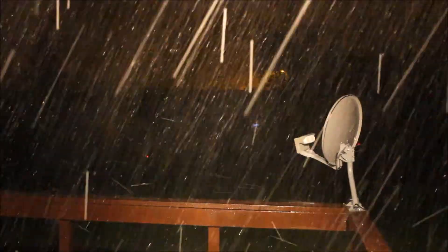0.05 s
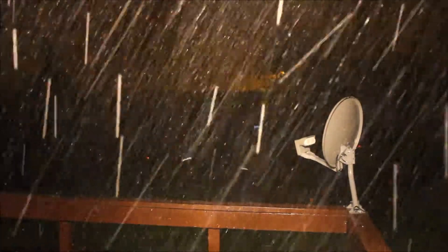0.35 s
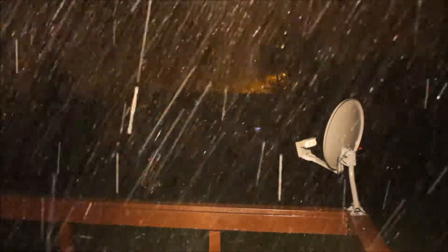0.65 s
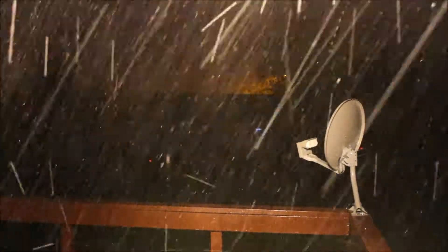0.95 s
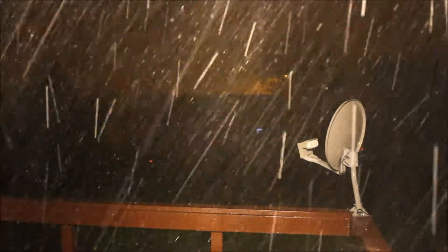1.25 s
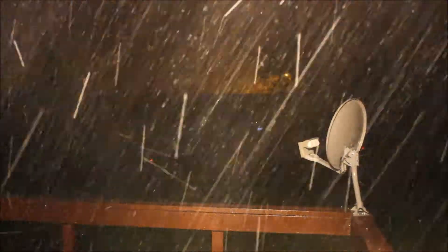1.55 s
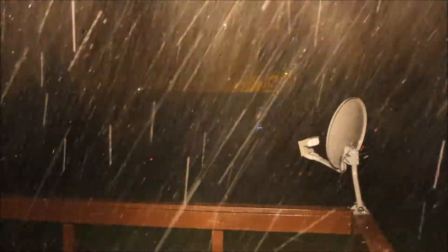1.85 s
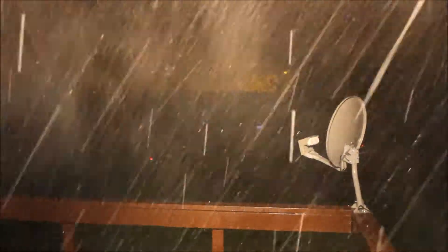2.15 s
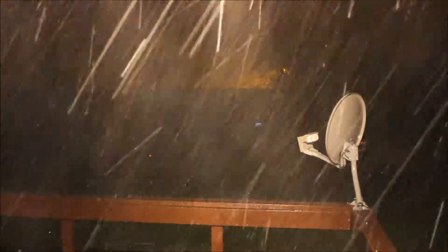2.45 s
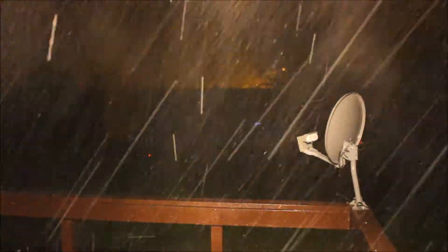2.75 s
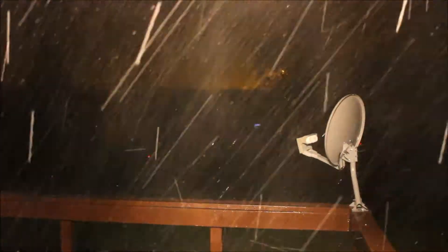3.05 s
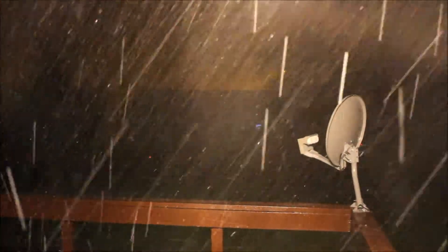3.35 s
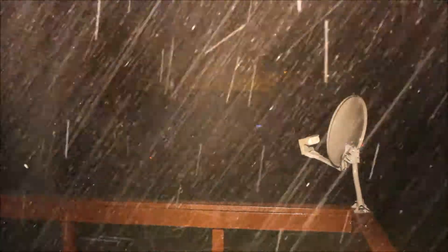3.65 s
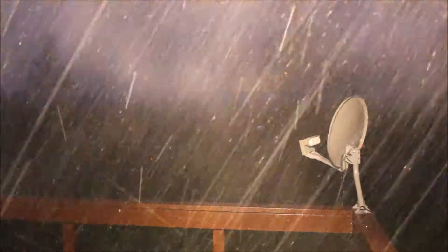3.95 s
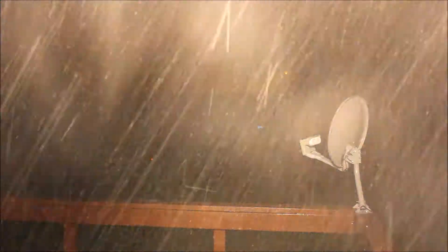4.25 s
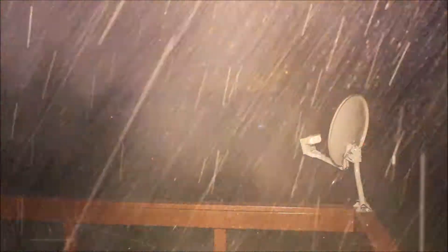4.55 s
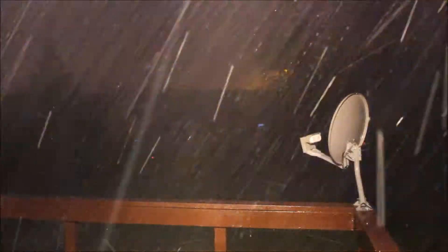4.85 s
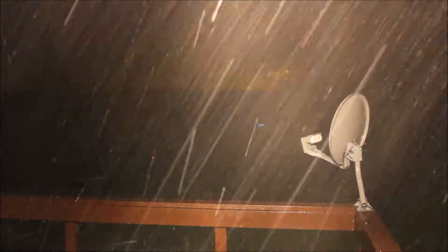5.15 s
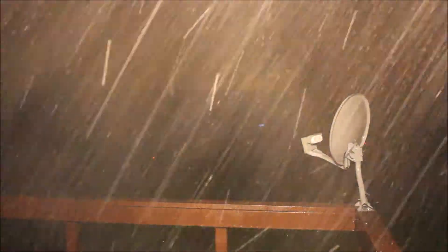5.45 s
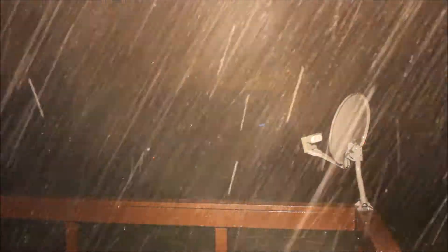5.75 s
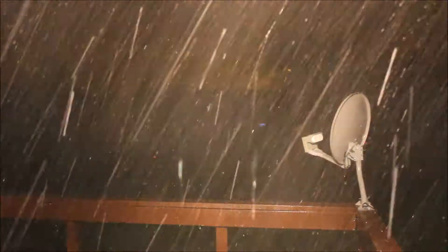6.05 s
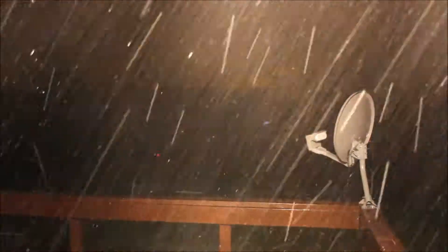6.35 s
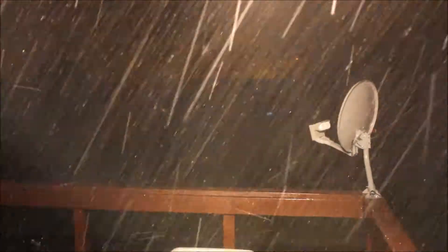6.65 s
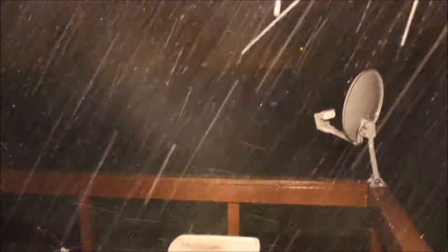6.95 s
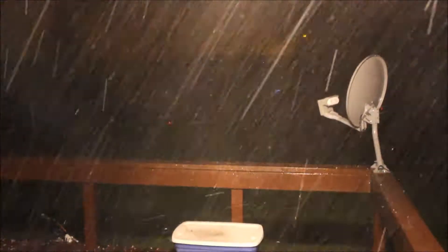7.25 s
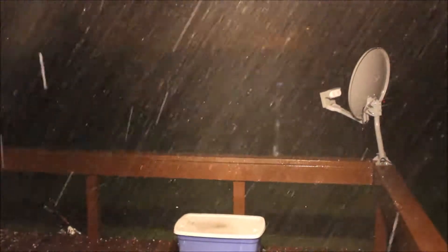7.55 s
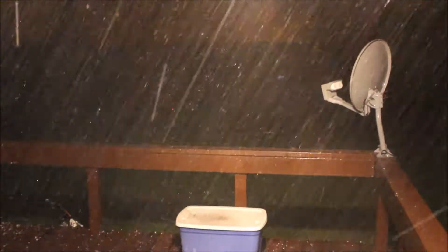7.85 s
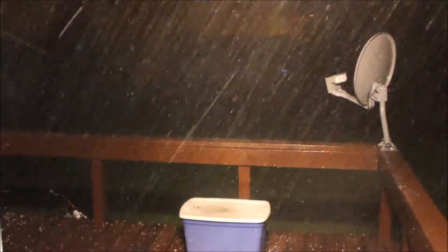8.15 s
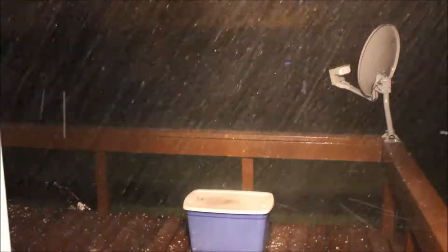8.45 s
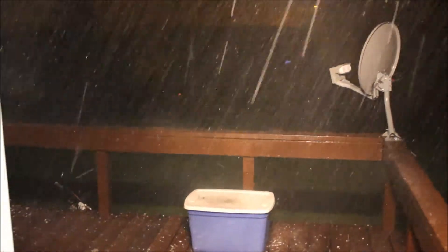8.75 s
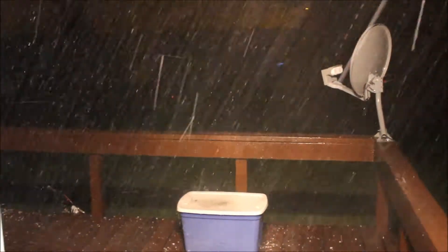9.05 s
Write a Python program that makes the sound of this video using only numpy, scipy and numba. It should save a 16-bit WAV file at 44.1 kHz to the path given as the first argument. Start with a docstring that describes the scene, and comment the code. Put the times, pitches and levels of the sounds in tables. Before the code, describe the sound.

Heavy rain mixed with small hail pours onto a wooden deck, with sharp cracks and occasional pings on metal.

```python
"""The edge of a wooden deck at night, in a downpour mixed with small hail, heard in mono.
Countless far drops merge into a wash, drum on the roof and set a metal panel singing, over a low wind.
Near drops tick and spray on the boards, and gusts throw clumps of water and ice. Up front, single
hailstones crack on wet wood or ping on metal, and a limiter ducks after the hardest hits."""
import sys
import numpy as np
from scipy import signal
from scipy.fft import rfft, irfft, next_fast_len
from scipy.io import wavfile
from scipy.ndimage import uniform_filter1d, minimum_filter1d
from numba import njit

SR = 44100
rng = np.random.default_rng(int(sys.argv[2]) if len(sys.argv) > 2 else 0)


def transcribe(signal):
    """Save signal, clipped to [-1, 1], as a 16-bit WAV file at the path in sys.argv[1]."""
    frames = np.atleast_2d(signal).T
    limited = np.clip(frames, -1, 1)
    pcm = np.round(limited * 32767).astype(np.int16)
    wavfile.write(sys.argv[1], SR, pcm)


N = 401751

# Fader moves of the downpour. Each row: time in seconds, rain level in dB, fine spray and drumming
# in dB relative to the rain, roof rumble in dB. The mix adds its own trims.
DOWNPOUR = [(0.0, -23.5, -2.5, -13, -43.9), (0.88, -25, -2, -12, -43.5), (0.98, -26.5, -3, -11.5, -45),
            (1.22, -22.5, -3, -9.5, -39.5), (1.62, -23, -1.7, -13.5, -43), (1.72, -26, -3.3, -11.5, -44),
            (1.9, -24.4, -0.5, -11, -43.5), (2.42, -24.8, -2.0, -12.5, -41.9),
            (2.56, -23.5, -1.3, -9.5, -43.3), (2.98, -24.0, -2.2, -11.9, -41.6),
            (3.08, -21, -3.5, -11.5, -44), (3.32, -25.5, -1.5, -12, -44), (3.58, -21.5, -4, -9.5, -36.8),
            (3.78, -23.5, -1.7, -11.5, -40.9), (4.1, -20, -0.5, -12, -38), (4.36, -25, -0.3, -11.8, -45),
            (4.99, -25.5, -1.3, -12, -41), (5.61, -23.5, 0.7, -10.5, -37.5), (5.75, -27.5, 0, -12.6, -43),
            (6.11, -23, 0.0, -11.5, -39.7), (7.29, -23, -0.7, -11, -38.5),
            (7.39, -25.4, -1.5, -12.0, -41.6), (7.89, -25.5, -2, -10.5, -40.5), (8.27, -25, -2, -10.5, -37),
            (9.11, -24.5, -1.7, -10.0, -39.5)]
# EQ curves for wind, roof thumps, far wash and near patter. Each row: frequency in Hz, gain in dB.
WIND_EQ = [(25, -24), (42, -29), (60, -3), (80, 0), (110, 4), (200, -19), (500, -50)]
ROOF_EQ = [(40, -39), (90, -24), (130, -3), (190, -1), (240, 5), (350, 5.5), (450, -7.5), (800, -36)]
WASH_EQ = [(300, 1.5), (440, -6), (600, -3.5), (760, -1), (900, -2), (1150, -2), (2000, -2.5),
           (3100, -0.84), (4200, -2.5), (6200, -4.5), (8600, -4), (11700, -5), (14300, -7), (15500, -10.5)]
PATTER_EQ = [(200, -29), (700, -2.5), (2000, -0.5), (4000, 1.5), (7000, 4), (10000, 6), (13000, 3),
             (15500, -3)]
# Modes of the roof, a sheet-metal panel and the metal that hail strikes.
# Each row: pitch in Hz, relative level in dB, seconds to die away by 60 dB.
ROOF_RINGS = [(102.5, -4.5, 0.4), (179, -0.5, 0.21), (230.5, 0, 0.17), (276, 1, 0.24), (331.4, -1.5, 0.4),
              (498, 2, 0.24)]
PANEL_RINGS = [(984, -3.5, 0.34), (589, -1, 0.2), (737, -1.5, 0.25), (783, -2.5, 0.29), (1018, -7, 0.13),
               (1150, -9.5, 0.23)]
METAL_RINGS = [(3640, 4, 0.083), (4710, -7, 0.18), (7000, -4, 0.096), (8360, 0.5, 0.067),
               (8700, -2.5, 0.084), (9100, -21, .1), (9300, -11, .1), (10000, -2, 0.086),
               (10600, -3.5, 0.054), (10800, -6, .07), (11960, -4.5, .07), (11930, -11, .08),
               (12900, -5, .08), (14000, -8, .1), (14560, -9, .1)]
# Gusts on the microphone. Each row: peak time in seconds, relative level in dB, half length in seconds.
WIND_GUSTS = [(3.55, -46, .12), (8.3, -44, 0.25)]
# Wind-thrown clumps of water and ice. Each row: peak time in seconds, level in dB, centre in Hz,
# width in octaves, fall time in seconds.
CLUMPS = [(0.335, -23, 2500, 1.2, .03), (0.497, -21.5, 3000, 1.2, .028), (0.692, -18, 12000, .6, .015),
          (0.703, -24, 1010, .13, .06), (0.775, -24.5, 1400, 1.2, .05), (1.399, -22.5, 1900, 0.18, .02),
          (1.615, -27.5, 710, .14, .03), (2.06, -24, 1500, 1.1, .04), (2.500, -28, 760, 0.2, 0.023),
          (2.645, -17, 3000, .87, 0.01), (2.82, -22, 1800, 1.0, .02), (3.020, -29, 980, 0.13, .06),
          (3.125, -22.5, 1500, 1.2, .018), (3.456, -18, 3000, 0.94, 0.0069),
          (3.931, -16.5, 1900, 0.93, 0.017), (3.945, -33, 173, .3, .03), (3.965, -18, 2700, 0.48, 0.026),
          (4.075, -21, 2200, 0.82, .055), (4.249, -18, 1400, 0.81, .005), (4.671, -12.5, 6000, 0.65, .007),
          (4.685, -25.5, 374, .35, 0.023), (4.69, -25, 930, 0.17, .016), (5.155, -26, 600, .5, .025),
          (5.363, -23, 1100, 0.85, .012), (5.535, -22, 660, .45, 0.022), (5.92, -35, 175, .3, 0.032),
          (6.42, -19, 5000, 1.5, 0.019), (6.688, -19, 3300, 0.89, 0.014), (6.883, -18, 2000, 1.2, .014),
          (7.251, -17, 8000, .5, .009), (7.254, -16, 4940, 0.11, .008), (8.122, -19, 1300, 1, .01),
          (8.139, -16, 2400, 1, .024), (8.360, -12, 3900, .6, .005), (8.557, -18.5, 1500, 1.3, .007),
          (8.76, -29, 620, 0.33, .03), (8.92, -24, 2500, .9, 0.016)]
# Hail on metal. Each row: start in seconds, relative level in dB, most favoured frequency in Hz,
# reach across the modes in octaves.
METAL_HITS = [(0.619, -8, 8500, .28), (0.843, -12, 10500, .4), (0.852, -10.5, 13500, 0.3),
              (1.667, -8, 8400, 0.87), (4.262, -14, 10000, .3), (4.272, -9, 12300, .25),
              (5.258, -10.5, 9000, 0.33), (5.525, -14, 9000, .7), (5.546, -10, 13000, 0.44),
              (7.253, -10, 4800, 0.19)]
# The loudest hailstones on the wet deck. Each row: start in seconds, relative crack level in dB,
# pitch in Hz, relative splat level in dB.
DECK_HITS = [(0.103, -2, 11000, -20), (0.214, -3, 10600, -20), (0.345, -5, 7200, -18.5),
             (0.503, 4.5, 9300, -22), (0.524, 1, 4900, -19), (1.005, -5, 8300, -20), (1.331, 1, 5800, -22),
             (1.508, -6, 8600, -22), (1.580, -5, 7500, -16), (1.835, -5, 5900, -23), (1.919, -4, 3800, -22),
             (2.116, -5, 6000, -19), (2.16, -2, 7100, -28), (2.267, -2, 6100, -21), (2.684, 1, 6450, -25),
             (3.004, -9, 7000, -20), (3.115, -1, 5370, -17), (3.274, -3, 3500, -22),
             (3.294, -11, 7000, -19), (3.618, -4, 6700, -21), (3.700, -3, 5600, -21),
             (3.756, -8, 9000, -21), (3.998, 6, 8100, -25), (4.246, 4.5, 10000, -27),
             (4.285, 6, 10300, -26), (4.399, -9, 6400, -19), (4.673, 0, 6300, -22), (4.827, -1, 5900, -22),
             (5.623, 5.5, 8600, -21), (5.718, -6, 9100, -25), (6.370, -5, 8400, -20),
             (6.689, -5, 7100, -18), (6.88, -6, 6000, -16), (6.937, -2, 8500, -26), (7.239, -6, 10200, -16),
             (7.406, -7, 7000, -18), (7.582, -3, 6900, -20), (7.815, 0, 8900, -23), (7.94, -7, 7000, -20),
             (8.003, 9, 9000, -17), (8.215, -8, 3000, -20), (8.271, -10, 4400, -19), (8.360, 1, 3940, -21),
             (8.449, -11, 2700, -22), (8.557, -9, 2900, -23), (8.66, -4, 4700, -26), (8.73, -11, 7000, -18),
             (8.77, -6, 8700, -23), (8.957, 0, 7400, -27), (9.076, -2, 9200, -20)]


def undb(db):
    """Decibels to gain."""
    return 10 ** (np.asarray(db) / 20)


def unit(x):
    """Scale to an rms of one."""
    return x / np.sqrt(np.mean(x ** 2))


def curves(table):
    """The columns of a time table as fader curves, one value a sample."""
    s, *columns = np.transpose(table)
    return [np.interp(np.arange(N) / SR, s, column) for column in columns]


def gain_at(hz, eq):
    """Gain of an EQ curve at the given frequencies."""
    points_hz, db = np.transpose(eq)
    return undb(np.interp(np.log(hz + 1e-9), np.log(points_hz), db))


def colour(x, eq):
    """Run a sound through an EQ curve."""
    return irfft(rfft(x) * gain_at(np.fft.rfftfreq(len(x), 1 / SR), eq), len(x))


def bell(hz, centre_hz, octaves):
    """A bell-shaped weight on the octave scale."""
    return np.exp(-.5 * (np.log2((hz + 1e-9) / centre_hz) / octaves) ** 2)


def band(x, centre_hz, octaves):
    """Keep a bell-shaped band of a sound."""
    return irfft(rfft(x) * bell(np.fft.rfftfreq(len(x), 1 / SR), centre_hz, octaves), len(x))


def low_cut(x, hz):
    """Roll off the lows at 12 dB an octave."""
    return signal.sosfilt(signal.butter(2, hz, "high", fs=SR, output="sos"), x)


def walk(rate):
    """A smooth random wander with about this many turns a second."""
    step = max(int(SR / rate), 1)
    stairs = np.repeat(rng.standard_normal(N // step + 1), step)
    return unit(uniform_filter1d(stairs, step)[:N])


def add(out, s, sound):
    """Mix a sound in, starting at s seconds."""
    i = max(int(s * SR), 0)
    out[i:i + len(sound)] += sound[:max(N - i, 0)]


def ring(hz, t60, t):
    """A struck mode."""
    return np.sin(2 * np.pi * hz * t) * np.exp(-np.log(1000) * t / t60)


def resonate(hits, modes):
    """Let hits ring a table of modes."""
    t = np.arange(SR // 2) / SR
    response = sum(undb(db) * ring(hz, t60, t) for hz, db, t60 in modes)
    return unit(signal.fftconvolve(hits, response)[:N])


@njit
def grains(start, hz, cycles, size):
    """Tiny damped rings, each fading from its start sample by 1 / e in its number of cycles."""
    out = np.zeros(N)
    for k in range(len(start)):
        life = cycles[k] * SR / hz[k]
        phasor, turn = size[k] + 0j, np.exp(2j * np.pi * hz[k] / SR - 1 / life)
        for i in range(int(start[k]), min(int(start[k] + 6 * life) + 2, N)):
            out[i] += phasor.imag
            phasor *= turn
    return out


@njit
def peak_hold(x, release):
    """An envelope that jumps to each peak and sinks back."""
    out, level = np.empty(len(x)), 0.
    for i in range(len(x)):
        level = max(abs(x[i]), level * release)
        out[i] = level
    return out


def smooth(x, keep):
    """A one-pole lag that keeps this share of its value each sample."""
    return signal.lfilter([1 - keep], [1, -keep], x)


def grit(length, spread_db, piece_samples):
    """Noise in short pieces of uneven strength, like a clump of droplets."""
    strength = undb(spread_db * np.clip(rng.standard_normal(length // piece_samples + 1), -2, 2))
    return rng.standard_normal(length) * np.repeat(strength, piece_samples)[:length]


def spray(hits, fall_s):
    """Each hit bursts into droplets: a hiss that takes its energy and dies away."""
    energy = smooth(hits ** 2 + 1e-18, np.exp(-2 / (fall_s * SR)))
    hiss = np.diff(rng.standard_normal(N + 1))
    return np.sqrt(energy) * unit(signal.lfilter([1], [1, -.5], hiss))


def drops(count, pitch_hz, octaves, cycles, spread_db):
    """Drops land at random, many small and a few large, each a tick of its own pitch."""
    when, pitch, damping, weight = rng.random((count, 4)).T
    hz = np.minimum(pitch_hz * 2 ** (octaves * (2 * pitch - 1)), .4 * SR)
    size = undb(spread_db * -np.log(weight + .017))  # capped: drops break up above a certain size
    ticks = grains(when * N, hz, cycles * (.5 + damping), size)
    return unit(ticks - ticks.mean())


def wind(breeze_db=-56, wander_db=2.5):
    """Eddies press on the microphone: a wandering breeze with gusts on top."""
    t = np.arange(N) / SR
    gusts = sum(undb(db) * np.exp(-((t - s) / half_s) ** 2) for s, db, half_s in WIND_GUSTS)
    breeze = undb(breeze_db + wander_db * walk(3))
    return np.hypot(breeze, gusts) * unit(colour(rng.standard_normal(N), WIND_EQ))


def roof(ring_db=-5):
    """Heavy drops thump on the roof, ring its low modes and blur into a rumble."""
    thumps = drops(count=5000, pitch_hz=2500, octaves=0.55, cycles=0.29, spread_db=3.0)
    return unit(unit(colour(thumps, ROOF_EQ)) + undb(ring_db) * resonate(thumps, ROOF_RINGS))


def panel():
    """Drumming drops keep a sheet-metal panel singing."""
    hits = drops(count=400, pitch_hz=2500, octaves=0.85, cycles=0.6, spread_db=-1.5)
    return resonate(hits, PANEL_RINGS)


def wash(spray_db, drum_db, flicker_db=1.06, flutter_db=0.91, spray_ref_db=0.5, drum_ref_db=-10):
    """Far drops merge into a bed of noise; its top rides the spray, its low end the drumming."""
    size = next_fast_len(N)
    hz = np.fft.rfftfreq(size, 1 / SR)
    bass_fade = 1 - bell(np.maximum(hz, 250), 240, 0.49)  # far drops carry no bass
    spectrum = rfft(rng.standard_normal(size)) * gain_at(hz, WASH_EQ) * bass_fade
    spectrum /= np.std(irfft(spectrum * ((hz > 1300) & (hz < 6000))))  # the mids set the level
    out = 0
    for centre in 250 * 2 ** np.arange(0, 6.5, .5):  # each half octave flickers on its own
        share = np.maximum(1 - 2 * abs(np.log2((hz + 1e-9) / centre)), 0)
        top_db = bell(centre, 9900, 0.66) * (spray_db - spray_ref_db)
        low_db = bell(centre, 600, 0.95) * (drum_db - drum_ref_db)
        out = out + irfft(spectrum * share)[:N] * undb(top_db + low_db + flicker_db * walk(28))
    return out * undb(flutter_db * walk(45))


def patter(spray_db, tick_db=-8, burst_db=-11, tap_db=-11, mist_db=-8, burst_mist_db=2):
    """Near drops tick on wet boards with a short hiss; some burst into mist, and heavy ones tap lower."""
    ticks = drops(count=10000, pitch_hz=10600, octaves=0.92, cycles=0.38, spread_db=5.5)
    ticks += undb(mist_db) * spray(ticks, fall_s=0.0047)
    bursts = drops(count=600, pitch_hz=9000, octaves=0.83, cycles=0.47, spread_db=4.0)
    bursts += undb(burst_mist_db) * spray(bursts, fall_s=0.0043)
    taps = drops(count=5000, pitch_hz=2730, octaves=1.25, cycles=1.8, spread_db=3.5)
    sizzle = colour(undb(tick_db) * unit(ticks) + undb(burst_db) * unit(bursts), PATTER_EQ)
    return sizzle * undb(0.37 * spray_db) + undb(tap_db) * taps


def clacks(scatter_db=-6):
    """Small hail pellets hit the boards: woody clacks, each with a short scatter."""
    hits = drops(count=450, pitch_hz=3760, octaves=0.77, cycles=2.5, spread_db=2.0)
    return unit(hits + undb(scatter_db) * spray(hits, fall_s=0.0055))


def splashes(rise_share=.35):
    """A clump of drops lands together: a gritty burst in the pitch range of what it hits."""
    out, t = np.zeros(N), np.arange(-SR // 10, SR // 4) / SR
    for s, db, centre_hz, octaves, fall_s in CLUMPS:
        envelope = np.exp(-abs(t) / np.where(t < 0, rise_share * fall_s, fall_s))
        burst = envelope * band(grit(len(t), spread_db=3.0, piece_samples=40), centre_hz, octaves)
        add(out, s + t[0], undb(db) * unit(burst) * np.sqrt(np.mean(envelope ** 2)))
    return out


def splats(boost_db=3, fall_s=0.0065):
    """Each hailstone throws a brief crown of uneven droplets off the wet boards."""
    out, t = np.zeros(N), np.arange(SR // 20) / SR
    for s, _, _, db in DECK_HITS:
        droplets = grit(len(t), spread_db=1.5, piece_samples=8)
        crown = unit(band(droplets, centre_hz=9500, octaves=1.0))
        add(out, s, undb(db + boost_db) * crown * np.exp(-t / fall_s))
    return out


def pings(click_db=2, click_s=0.00067, rattle_db=-14, rattle_s=.009, uneven_db=2.5):
    """A hailstone clicks on metal and rattles briefly; where it lands decides which modes speak."""
    out, t = np.zeros(N), np.arange(SR // 4) / SR
    contact = undb(click_db) * np.exp(-t / click_s) + undb(rattle_db) * np.exp(-t / rattle_s)
    for s, level_db, centre_hz, reach in METAL_HITS:
        spots_db = uneven_db * rng.standard_normal(len(METAL_RINGS))
        modes = sum(undb(db + spot_db) * bell(hz, centre_hz, reach) * ring(hz, t60, t)
                    for (hz, db, t60), spot_db in zip(METAL_RINGS, spots_db))
        noise = unit(band(rng.standard_normal(len(t)), centre_hz, 2 * reach))
        add(out, s, undb(level_db) * (modes + contact * noise) / 2)
    return out


def cracks(cycles=0.94, boost_db=2.0, edge_db=-4, shatter_db=-9, chip_db=-9, chip_s=.0025):
    """A hailstone snaps on wood in a cycle or two; two chips land just after, and the rest scatters."""
    s, db, hz, _ = np.transpose(DECK_HITS)
    lags, detunes = rng.random((len(s), 2, 2)).T
    life, size = np.full(len(s), cycles), undb(db + boost_db)
    snaps = grains(s * SR, hz.copy(), life, size)
    edge_hz = np.minimum(1.84 * hz, .33 * SR)  # the first hard contact is brighter than the wood
    snaps += grains(s * SR, edge_hz, life / 2, size * undb(edge_db))
    for lag, detune in zip(lags, detunes):
        chip_hz = np.minimum(hz * (1 + detune), .33 * SR)
        snaps += grains((s + chip_s * lag) * SR, chip_hz, life, size * undb(chip_db))
    return snaps + undb(shatter_db) * spray(snaps, fall_s=.003)


def scene(wash_db=-0.45, panel_db=-7, roof_db=-0.5, wind_db=-1, clack_db=-12):
    """The downpour rides the faders of wash, patter, panel, pellets and roof; single hits sit on top."""
    rain_db, spray_db, drum_db, rumble_db = curves(DOWNPOUR)
    sheets_db = 0.39 * walk(14)  # the rain swells and ebbs in uneven sheets
    rain = undb(wash_db) * wash(spray_db, drum_db) + patter(spray_db)
    rain += undb(panel_db + drum_db) * panel() + undb(clack_db) * clacks()
    lows = undb(rumble_db + roof_db + 1.6 * sheets_db) * roof() + undb(wind_db) * wind()
    impacts = undb(rain_db + sheets_db) * rain + splats() + cracks() + pings()
    impacts = low_cut(impacts, hz=170)  # the rain and hits on the deck keep clear of the deep bass
    mono = impacts + splashes() + lows
    return np.array([mono, mono])


def record(dry, threshold_db=-1, ratio=2.1, attack_s=.003, hold_s=0.062, release_s=0.062, top_hz=15800):
    """The deepest bass goes, a treble-keyed limiter ducks after hard hits, tips clip, the top is cut."""
    heard = low_cut(dry, hz=50)
    sidechain = low_cut(heard[0], hz=7000)
    hold = int(hold_s * SR)
    held = -minimum_filter1d(-abs(sidechain), hold, origin=(hold - 1) // 2)
    peak = peak_hold(held, np.exp(-1 / (release_s * SR)))
    overshoot = np.log(np.maximum(peak / undb(threshold_db), 1))
    duck = (1 - 1 / ratio) * smooth(overshoot, np.exp(-1 / (attack_s * SR)))
    clipped = np.clip(heard * np.exp(-duck), -.85, .85)
    return signal.sosfilt(signal.ellip(10, .2, 80, top_hz, fs=SR, output="sos"), clipped)


dry = scene()
out = record(dry)
transcribe(out)
```